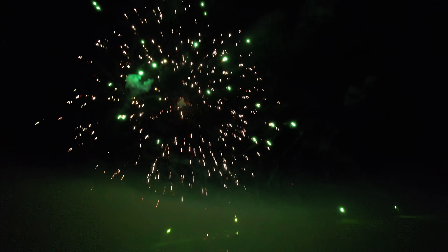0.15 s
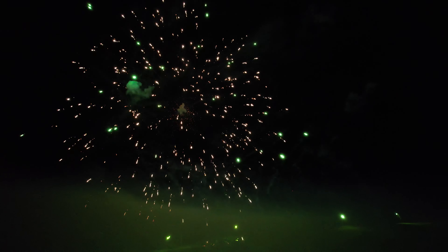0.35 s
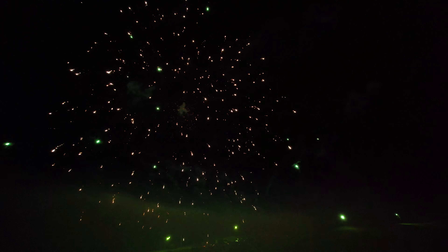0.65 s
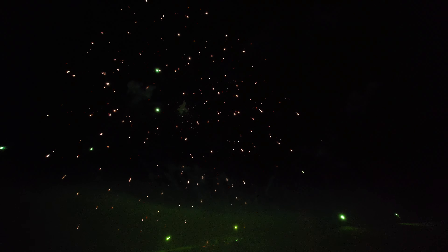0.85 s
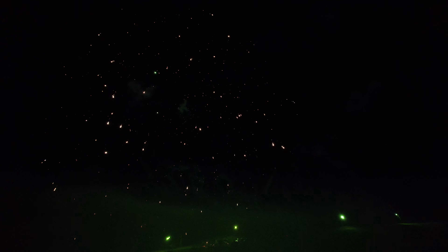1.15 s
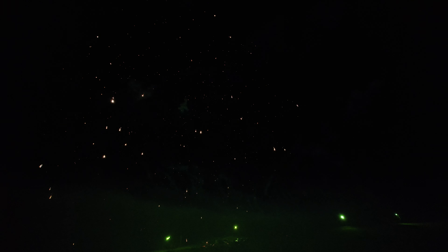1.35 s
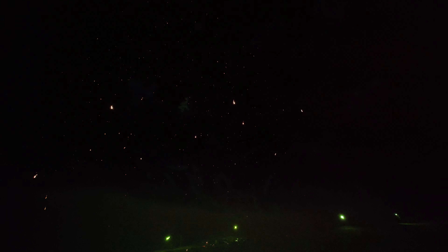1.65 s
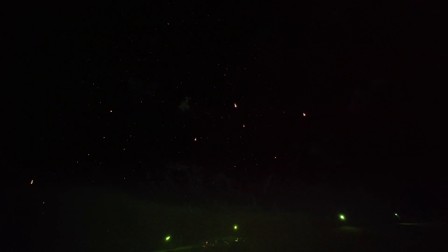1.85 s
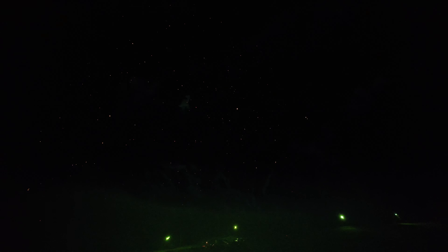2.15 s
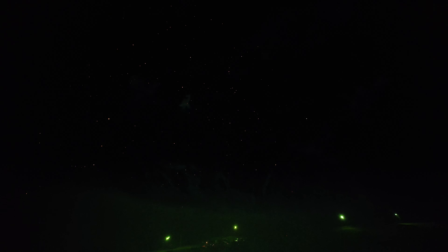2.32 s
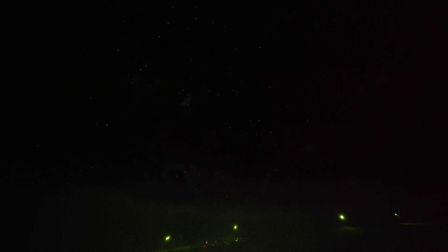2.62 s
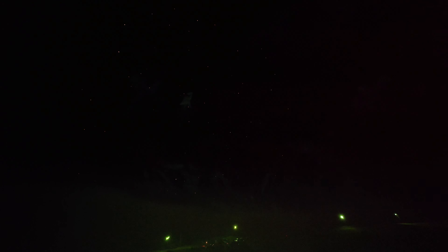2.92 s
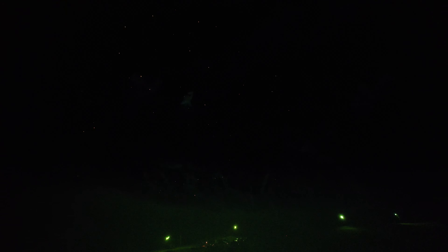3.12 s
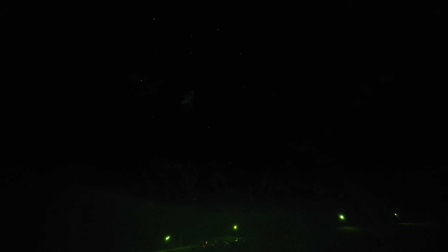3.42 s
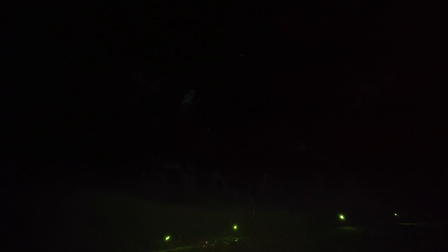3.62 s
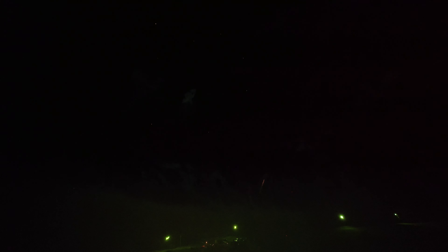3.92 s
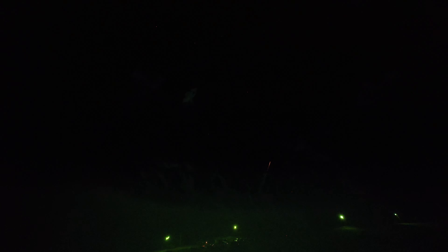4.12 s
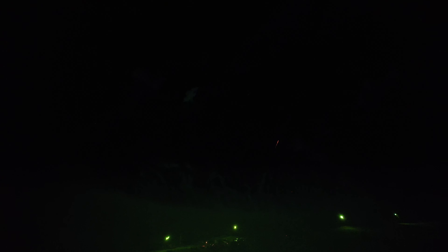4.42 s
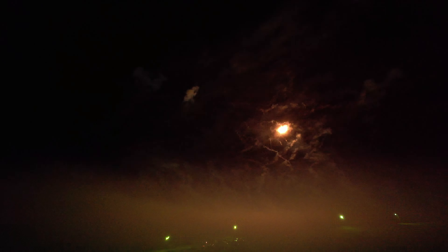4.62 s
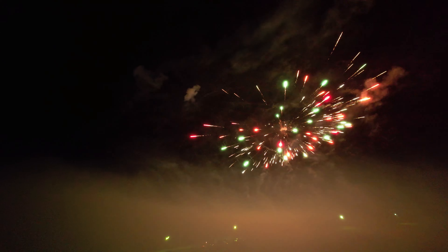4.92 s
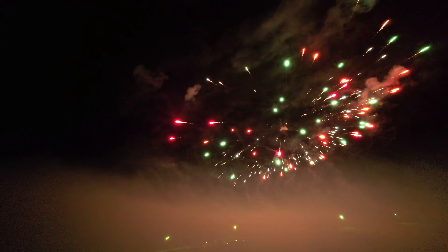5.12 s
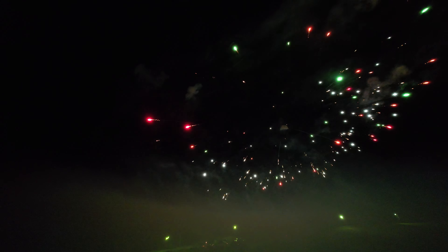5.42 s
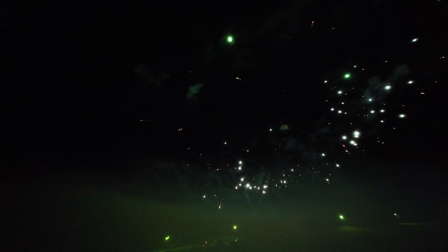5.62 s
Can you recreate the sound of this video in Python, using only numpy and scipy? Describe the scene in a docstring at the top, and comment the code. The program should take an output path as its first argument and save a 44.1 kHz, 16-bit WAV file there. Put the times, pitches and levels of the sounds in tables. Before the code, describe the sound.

Outdoors at night, the rolling echo of an earlier firework fades over a low rumble. A heavy tearing bang cracks midway, then a shorter, sharper one, then another dense bang near the end. Each scatters crackling slaps and a grainy roll from surrounding slopes. The recorder's automatic gain ducks at each bang and background creeps back up.

```python
"""Three bangs over a low rumble, a hollow wash and a faint hiss.
Each bang is a short tearing crack of shaped noise over a knock and a boom, with N-shaped shock waves.
It crackles back from things nearby, returns from two slopes and lingers; far hills send late echoes.
These are swells of grainy noise, and the echoes of an earlier, unheard bang open the scene.
The recorder's gain control ducks at every bang and creeps back, so the background swells in between."""
import sys
import numpy as np
from scipy import signal
from scipy.fft import rfft, irfft
from scipy.io import wavfile
from scipy.ndimage import uniform_filter1d

SR = 44100
rng = np.random.default_rng(int(sys.argv[2]) if len(sys.argv) > 2 else 0)


def file_out(sig):
    """Save sig as 16-bit WAV at sys.argv[1]."""
    # one column per channel
    cols = np.atleast_2d(sig).T
    # limit, then scale
    lim = np.clip(cols, -1, 1)
    pcm = np.round(lim * 32767).astype(np.int16)
    wavfile.write(sys.argv[1], SR, pcm)


N = 254016
TIME = np.arange(N) / SR

# bangs: time_s, half_width_s, crack_db, crack_pitch_hz, crack_upper_edge_hz, knock_db, boom_db,
# tail_db (relative to the crack's envelope)
BANGS = [(2.5539, 0.0082, 13.5, 2230, 9600, 11, 11, -18.5),
         (4.2941, 0.0067, -24, 2220, 12000, 4.5, -8, -14),
         (5.3234, 0.0052, 10.5, 4160, 7000, -4.5, 10.5, -27)]
# echoes of the earlier bang, then of each bang: near_slope_delay_s, far_slope_delay_s, roll_db, swish_db,
# smear_factor, linger_db, crackle_db, crackle_delay_s
BANG_ECHOES = [(0.24, 0.5, 5, 7, 1.68, -17.5, -30, 0.19), (0.3, 0.47, -12.5, -10, 1.1, -47, -32, 0.1),
               (0.29, 0.44, 1, -1.5, 0.46, -14, -25.5, 0.21),
               (0.23, 0.517, -0.5, 2.5, 1.2, -49, -28.5, 0.097)]
# left-right likeness of the background and echoes: pitch_hz, likeness (0-1)
FAR_LIKENESS = [(70, 1), (190, 0.99), (290, 0.97), (640, 0.78), (1400, 0.16), (3000, 0.57), (6800, 0.81),
                (13000, 0)]
# left-right likeness of the bangs: pitch_hz, likeness (0-1)
BANG_LIKENESS = [(150, 0.74), (1000, 0.38), (2200, 0.69), (4500, 0.85), (9000, 0.2)]


def from_db(db):
    """Decibels to gain."""
    return 10 ** (np.asarray(db) / 20)


def in_time(rows):
    """Each column of a time curve, interpolated sample by sample."""
    time_s, *columns = np.transpose(rows)
    return [np.interp(TIME, time_s, column) for column in columns]


def at_hz(points, hz):
    """A table read on a log-frequency axis."""
    table_hz, value = np.transpose(points)
    return np.interp(np.log(hz), np.log(table_hz), value)


def noise(colour, likeness, source=None):
    """Stereo noise of one colour, falling steeply beyond its ends; rms 1."""
    # the left side is the brighter one: pitch_hz, left_minus_right_db
    balance = [(100, 0.05), (400, 1.5), (2300, 3), (4400, 1.5), (8000, 1.5), (14000, 10.5)]
    hz = np.maximum(np.arange(N // 2 + 1) * SR / N, 1)
    ends = np.minimum(1, np.minimum(hz / colour[0][0], colour[-1][0] / hz)) ** 2
    alike = np.clip(at_hz(likeness, hz), 0, 1)
    sides = np.array([[1], [-1]])
    mid, side = rfft(rng.standard_normal((2, N)) if source is None else source)
    pair = np.sqrt(1 + alike) * mid + np.sqrt(1 - alike) * side * sides
    level_db = at_hz(colour, hz) + sides * at_hz(balance, hz) / 2
    out = irfft(pair * ends * from_db(level_db), N)
    return out / out.std()


def grain(per_s, depth_db):
    """Uneven strength of many small reflections that arrive close together; rms 1."""
    knots = np.linspace(0, TIME[-1], int(per_s * TIME[-1]))
    unevenness = np.interp(TIME, knots, rng.standard_normal(len(knots)))
    gain = from_db(depth_db * unevenness)
    return gain / np.sqrt(np.mean(gain ** 2))


def patter(x, per_s, depth_db, count=10):
    """Scattered reflections: each narrow band of the sound flickers on its own."""
    spectrum = rfft(x)
    edges_hz = np.geomspace(1500, 9000, count)
    band = np.digitize(np.arange(N // 2 + 1) * SR / N, edges_hz)
    return sum(grain(per_s, depth_db) * irfft(spectrum * (band == k), N) for k in range(count + 1))


def favour(x, hz, boost_db, sharpness):
    """The sound with a resonant copy of one pitch region added."""
    return x + from_db(boost_db) * signal.lfilter(*signal.iirpeak(hz, sharpness, fs=SR), x)


def swell(peak_s, rise_s, fade_s):
    """An echo gathers to its peak, then dies away."""
    age = TIME - peak_s
    return np.exp(-(np.minimum(age, 0) / rise_s) ** 2 - np.maximum(age, 0) / fade_s)


def blast(shape, colour, even_hz=420):
    """A brief rush of noise under an envelope, its spectrum evened out so that it sounds solid."""
    spectrum = rfft(shape * rng.standard_normal((2, N)))
    local_power = uniform_filter1d(abs(spectrum) ** 2, int(even_hz * N / SR))
    even = irfft(spectrum / np.sqrt(local_power), N)
    return np.sqrt(np.mean(shape ** 2)) * noise(colour, BANG_LIKENESS, even)


def rumble():
    """A slowly changing low rumble of noise with several humps in the bass."""
    # loudness of the rumble: time_s, level_db
    loudness = [(0, -19), (2.5, -15.5), (3.2, -20.5), (4.2, -20), (5.76, -18.5)]
    # its colour: pitch_hz, level_db
    colour = [(20, -28), (29, -7.5), (37, -3), (47, -8), (62, -5), (74, -10.5), (87, 1.5), (101, -12),
              (180, -13.5), (300, -20), (500, -41), (780, -42), (2000, -72.5)]
    return from_db(in_time(loudness)[0]) * noise(colour, FAR_LIKENESS)


def wash():
    """A hollow wash of noise in the mids that sinks and swells."""
    # loudness of the wash: time_s, level_db
    loudness = [(0, -27), (2.55, -36.5), (2.62, -47), (4.25, -41), (4.5, -42), (4.95, -53), (5.25, -27),
                (5.76, -27.5)]
    # its colour: pitch_hz, level_db
    colour = [(400, 3), (600, 5), (790, -7), (930, 4.5), (1100, -5.5), (1300, -1.5), (2200, -10.5),
              (3200, -27)]
    return from_db(in_time(loudness)[0]) * noise(colour, FAR_LIKENESS)


def near_echoes():
    """A dull grumble right behind each bang, and a crackle scattered off things nearby."""
    # colour of the grumble: pitch_hz, level_db
    grumble_colour = [(120, -15), (200, 4), (330, -5), (480, -15.5), (700, -47)]
    # colour of the crackle: pitch_hz, level_db
    crackle_colour = [(1000, -19), (1900, -1.5), (2400, -6), (3300, -2), (4400, -0.5), (6000, -8.5),
                      (7500, -9), (9000, -23.5), (14000, -36)]
    grumble_power, crackle_power = np.zeros((2, N))
    for bang_s, (*_, crackle_db, crackle_delay_s) in zip(bang_times(), BANG_ECHOES):
        grumble = from_db(-15.5) * swell(bang_s + 0.017, rise_s=0.029, fade_s=0.14)
        crackle = from_db(crackle_db) * swell(bang_s + crackle_delay_s, rise_s=0.065, fade_s=0.28)
        grumble_power += grumble ** 2
        crackle_power += crackle ** 2
    scatter = patter(noise(crackle_colour, FAR_LIKENESS), per_s=80, depth_db=4.5)
    return (np.sqrt(grumble_power) * noise(grumble_colour, FAR_LIKENESS)
            + np.sqrt(crackle_power) * grain(per_s=550, depth_db=0.5) * scatter)


def distant_echoes():
    """Slopes and far hills return a low roll and a bright swish; the roll lingers."""
    # the near and the far slope: rise_s, fade_s (both before smearing), roll_db, swish_db
    slopes = [(0.12, 0.2, -17.5, -29), (0.095, 0.11, -12, -31)]
    # late echoes from distant hills: peak_s, rise_s, roll_db, swish_db
    far_hills = [(0.27, 0.09, -21, -38), (1.05, 0.78, -20.5, -37), (3.78, 0.51, -32, -34.5),
                 (5.241, 0.21, -21.5, -24)]
    # colour of the roll: pitch_hz, level_db
    roll_colour = [(40, -26), (100, -1.5), (220, -1), (330, -7.5), (420, -15.5), (620, -19.5), (790, -22.5),
                   (950, -21), (1500, -23.5), (3000, -33.5), (8000, -70)]
    # colour of the swish: pitch_hz, level_db
    swish_colour = [(150, 8.5), (500, -16.5), (1300, 3), (2300, 1.5), (3200, -5), (5000, -8), (7500, -26),
                    (9000, -47), (14000, -75)]
    roll_power, swish_power = np.zeros((2, N))
    for bang_s, echo in zip(bang_times(), BANG_ECHOES):
        near_s, far_s, own_roll_db, own_swish_db, smear, linger_db, *_ = echo
        roll_power += (from_db(linger_db) * swell(bang_s + 0.4, rise_s=0.1, fade_s=1)) ** 2
        for delay_s, (rise_s, fade_s, roll_db, swish_db) in zip((near_s, far_s), slopes):
            level = swell(bang_s + delay_s, smear * rise_s, smear * fade_s)
            roll_power += (from_db(roll_db + own_roll_db) * level) ** 2
            swish_power += (from_db(swish_db + own_swish_db) * level) ** 2
    for peak_s, rise_s, roll_db, swish_db in far_hills:
        level = swell(peak_s, rise_s, fade_s=0.64 * rise_s)
        roll_power += (from_db(roll_db) * level) ** 2
        swish_power += (from_db(swish_db) * level) ** 2
    roll = grain(per_s=90, depth_db=2.0) * noise(roll_colour, FAR_LIKENESS)
    swish = patter(noise(swish_colour, FAR_LIKENESS), per_s=90, depth_db=2.5)
    swish = grain(per_s=160, depth_db=0.26) * swish
    return np.sqrt(roll_power) * roll + np.sqrt(swish_power) * swish


def bang_times():
    """Times of a bang just before the start, of which only echoes are heard, and of the three bangs."""
    return [-0.23] + [bang[0] for bang in BANGS]


def hiss():
    """A faint hiss of noise with two narrow gliding bands."""
    # loudness of the broad hiss: time_s, level_db
    loudness = [(0, -79), (.9, -52.5), (1.8, -44.5), (2.5, -44.5), (3.3, -53.5), (4.3, -48), (5.25, -43.5),
                (5.6, -67)]
    # its colour: pitch_hz, level_db
    colour = [(1000, -22), (2300, -0.5), (3100, -8.5), (4100, -3.5), (5000, -4.5), (5900, -11.5),
              (6700, -5.5), (7600, -5), (8200, -16), (9200, -16), (10500, -23.5), (13000, -25),
              (15500, -34)]
    # the lower narrow band: time_s, centre_hz, level_db
    low_band = [(.9, 4420, -69), (1.5, 4250, -47), (2.5, 4396, -50.5), (3.1, 3870, -44), (3.4, 3880, -45),
                (3.7, 4443, -57), (4.2, 4750, -53), (4.9, 4017, -40), (5.5, 4427, -38.5), (5.76, 4413, -53)]
    # the higher narrow band: time_s, centre_hz, level_db
    high_band = [(.9, 7140, -63), (1.6, 7040, -57), (2.5, 7070, -58), (3.1, 7020, -58), (4.1, 7110, -56.5),
                 (4.9, 7010, -61)]
    broad = from_db(in_time(loudness)[0]) * noise(colour, FAR_LIKENESS)
    return broad + hiss_band(low_band, width_hz=810) + hiss_band(high_band, width_hz=490)


def hiss_band(curve, width_hz):
    """A narrow band of noise whose centre glides by frequency shifting."""
    hz, level_db = in_time(curve)
    centre = hz.mean()
    colour = [(centre - 2 * width_hz, -30), (centre - width_hz / 2, -3), (centre, 0),
              (centre + width_hz / 2, -3), (centre + 2 * width_hz, -30)]
    band = noise(colour, FAR_LIKENESS)
    shift = np.exp(2j * np.pi * np.cumsum(hz - centre) / SR)
    return from_db(level_db) * np.real(signal.hilbert(band) * shift)


def slaps(rise_s=0.0009):
    """Nearby things scatter the crack back as short grainy splashes, each favouring a pitch of its own."""
    # the loudest slap echoes: start_s, level_db (before the boost), fade_s, pitch_hz, boost_db
    slap_echoes = [(0.187, -24, 0.0046, 1400, 24), (0.227, -28, 0.0063, 1290, 28.5),
                   (0.290, -29, 0.004, 1910, 22), (0.308, -30, 0.011, 1500, 28),
                   (2.575, 5, 0.0022, 5340, 9), (2.612, -20.5, 0.01, 5300, 6),
                   (2.645, -34, 0.014, 5000, 20), (2.791, -36, 0.05, 2500, 7), (2.900, -36, 0.006, 5240, 8),
                   (2.954, -26.5, .005, 890, 26.5), (2.978, -30.5, 0.023, 2000, -5),
                   (3.024, -20.5, 0.0061, 5800, 8.5), (3.038, -28, 0.027, 3420, 4),
                   (3.086, -35, 0.028, 3820, 12), (4.323, -28, 0.026, 4700, -1),
                   (4.358, -32, 0.0036, 2480, 2), (4.417, -23, 0.0087, 4730, 12),
                   (4.530, -35, 0.048, 2750, 15), (4.543, -29, 0.012, 4440, 13),
                   (4.596, -11.5, 0.0034, 2150, 2), (4.622, -29, 0.0084, 990, 30),
                   (4.651, -24, 0.025, 5000, 3), (4.725, -21.5, 0.016, 6560, 8),
                   (4.740, -27, 0.019, 3630, 14.5), (4.895, -34, 0.016, 3900, 4),
                   (5.340, -5.5, 0.0033, 5600, 12), (5.378, -31, 0.008, 6000, 14),
                   (5.397, -29, 0.015, 5000, 10), (5.411, -27, 0.017, 4460, 19.5),
                   (5.458, -20, 0.02, 6000, 4), (5.495, -27, 0.028, 4500, 12),
                   (5.537, -32, 0.027, 4330, 15.5), (5.578, -29, 0.005, 3870, 12)]
    # their shared colour: pitch_hz, level_db
    colour = [(900, -11), (1500, -3.5), (2400, 3), (3300, -4), (4500, -6), (6000, -9), (7600, -13),
              (9000, -29), (14000, -52)]
    scatter = grain(per_s=340, depth_db=3.5) * noise(colour, FAR_LIKENESS)
    out = np.zeros((2, N))
    for start_s, level_db, fade_s, hz, boost_db in slap_echoes:
        age = np.maximum(TIME - start_s, 0)
        level = from_db(level_db) * (1 - np.exp(-age / rise_s)) * np.exp(-age / fade_s)
        out += level * favour(scatter, hz, boost_db, sharpness=6.7)
    return out


def shocks(swing_damping=0.52):
    """N-shaped pressure waves; the air rounds their edges, and without their deepest bass they swing back."""
    # shock waves: start_s, peak_db (before filtering), length_s, edge_hz (low-pass), swing_hz (high-pass)
    shock_waves = [(2.5417, 17.5, 0.01, 506, 52), (2.5488, 14.5, 0.0083, 600, 54),
                   (2.559, 24, 0.0047, 420, 107), (4.2966, 26.5, 0.001107, 3500, 406),
                   (4.2983, 21, 0.0023, 1110, 199.1), (4.741, -3.5, 0.0045, 570, 140.4),
                   (5.318, 12.5, 0.014, 517, 23.8), (5.3232, 16.5, 0.0019, 700, 388.9),
                   (5.3257, 14.5, 0.0014, 900, 430), (5.327, 21, 0.004, 520, 86.4)]
    out = np.zeros(N)
    for start_s, peak_db, length_s, edge_hz, swing_hz in shock_waves:
        phase = (TIME - start_s) / length_s
        wave = (1 - 2 * phase) * ((phase >= 0) & (phase < 1))
        rounding = signal.butter(2, edge_hz, fs=SR, output="sos")
        wave = signal.sosfilt(rounding, wave + 1e-18)   # the tiny offset is inaudible
        w = 2 * np.pi * swing_hz
        swing_back = signal.bilinear([1, 0, 0], [1, swing_damping * w, w * w], SR)
        out += from_db(peak_db) * signal.lfilter(*swing_back, wave)
    return out


def cracks(tail_s=0.016, skirt_db=-19, skirt_s=0.0038):
    """A few milliseconds of tearing noise with steep flanks and a short tail, over a knock and a boom."""
    # colour of the bright crack: pitch_hz, level_db
    crack_colour = [(500, -13), (900, -25.5), (1250, -16.5), (2100, 4), (2700, -1.5), (3300, -8.5),
                    (4400, 2), (6000, -4.5), (7600, -2.5), (8600, -13), (10000, -14), (15000, -26)]
    # colour of the hollow knock: pitch_hz, level_db
    knock_colour = [(170, 2.5), (260, 9.5), (480, -4), (750, -2.5), (900, -7.5), (1100, -8.5), (1500, -3.5),
                    (2000, -12.5), (2700, -24.5), (4500, -26), (8000, -41.5)]
    # colour of the low boom: pitch_hz, level_db
    boom_colour = [(40, 15.5), (70, -12), (140, -11), (250, 4.5), (480, -12), (800, -36)]
    boom = noise(boom_colour, BANG_LIKENESS)
    out = np.zeros((2, N))
    for time_s, width_s, crack_db, hz, edge_hz, knock_db, boom_db, tail_db in BANGS:
        age = TIME - time_s
        outside = np.maximum(abs(age) - width_s, 0)
        shape = np.exp(-(age / width_s) ** 6) + from_db(skirt_db) * np.exp(-outside / skirt_s)
        shape += from_db(tail_db) * np.exp(-outside / tail_s) * (age > 0)
        crack = favour(blast(shape, crack_colour), hz, boost_db=-4.0, sharpness=2.3)
        upper_edge = signal.butter(2, min(edge_hz, SR / 2 - 1), fs=SR, output="sos")
        out += from_db(crack_db) * signal.sosfilt(upper_edge, crack)
        out += from_db(knock_db) * blast(shape, knock_colour)
        out += from_db(boom_db) * shape * boom
    return out


def snaps():
    """The hardest instants of each bang: very short, bright rushes of noise."""
    # bright snaps inside the bangs: time_s, level_db, half_width_s
    instants = [(2.5519, 16, 0.0017), (4.2968, 7.5, 0.0002), (4.2997, -6, 0.0003), (5.3249, 13, 0.00082)]
    # their colour: pitch_hz, level_db
    colour = [(2000, -2), (4600, 7), (6500, -7.5), (9000, -9), (15000, -17.5)]
    shape = sum(from_db(level_db) * np.exp(-((TIME - time_s) / width_s) ** 2)
                for time_s, level_db, width_s in instants)
    return blast(shape, colour)


def hollow_tone():
    """A brief hollow tone of sine modes that swells and rises into the second bang, then stops dead."""
    # the tone: end_s, level_db, swell_s, relative_pitch_rise_per_s
    tone = (4.2965, 11.2, 0.0052, 3.3)
    # its modes: final_pitch_hz, relative_level_db
    modes = [(240, 0), (920, 0), (1240, -5), (1640, -13), (2090, -11), (3250, -20)]
    end_s, tone_db, swell_s, rise_per_s = tone
    ahead = np.maximum(end_s - TIME, 0)
    bent_time = (1 - rise_per_s * ahead / 2) * ahead
    mix = sum(from_db(level_db) * np.sin(2 * np.pi * hz * bent_time) for hz, level_db in modes)
    return from_db(tone_db) * np.exp(-ahead / swell_s) * mix


def lull():
    """A gain for the echoes and the hiss, which dip briefly."""
    # the dip: time_s, depth_db, half_width_s
    dip = (4.942, -5.5, 0.016)
    time_s, depth_db, width_s = dip
    return from_db(depth_db * np.exp(-((TIME - time_s) / width_s) ** 2))


def scene():
    """Bangs, their echoes and the background."""
    background = rumble() + wash()
    dipping = lull() * (near_echoes() + distant_echoes() + hiss())
    bangs = shocks() + cracks() + snaps() + hollow_tone()
    return background + dipping + slaps() + bangs


def record(dry):
    """The gain drops at once under a bang and climbs back steadily; peaks clip, the top is cut."""
    target_db, start_gain, recovery_per_s = -8, 0.21, 0.26   # rms ceiling, gain, gain regained per second
    detector_s, ceiling, cutoff_hz = 0.015, 0.94, 16000
    power = uniform_filter1d(np.mean(dry ** 2, axis=0), int(detector_s * SR))
    allowed = from_db(target_db) / np.sqrt(np.maximum(power, 1e-12))
    climb = recovery_per_s * TIME
    gain = climb + np.minimum(np.minimum.accumulate(allowed - climb), start_gain)
    fade = np.clip(np.minimum(TIME, TIME[-1] - TIME) / 0.003, 0, 1)   # 3 ms at both ends
    clipped = fade * np.clip(dry * gain, -ceiling, ceiling)
    top_cut = signal.cheby2(18, 70, cutoff_hz, fs=SR, output="sos")
    return signal.sosfilt(top_cut, clipped)


dry = scene()
out = record(dry)
file_out(out)
```